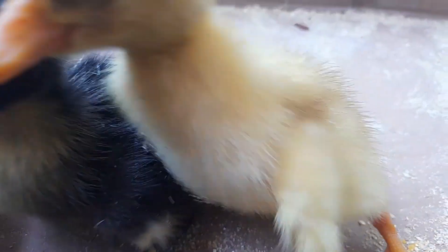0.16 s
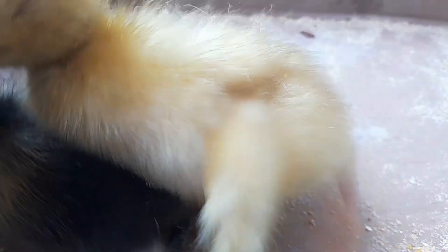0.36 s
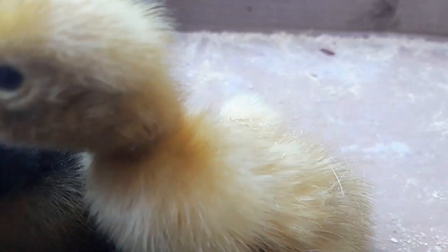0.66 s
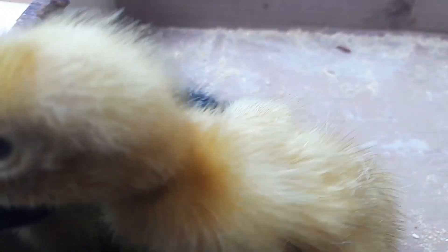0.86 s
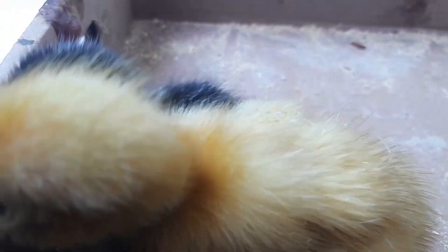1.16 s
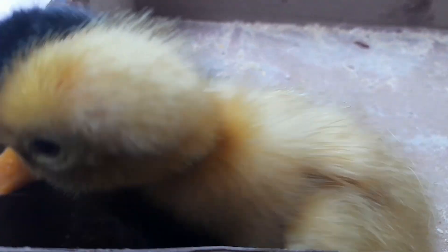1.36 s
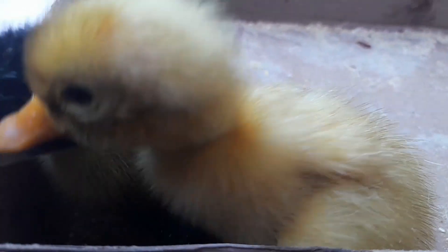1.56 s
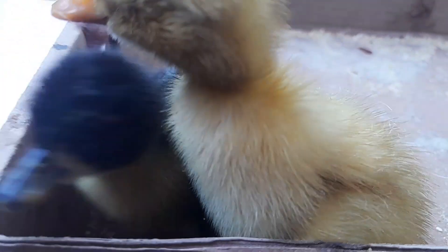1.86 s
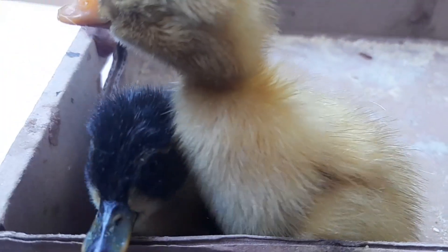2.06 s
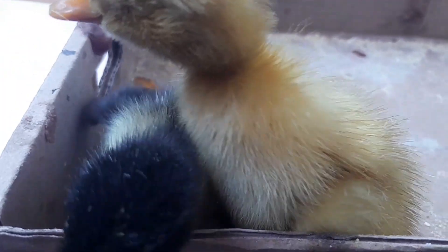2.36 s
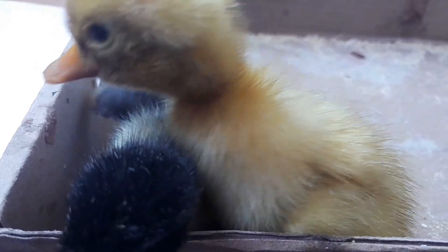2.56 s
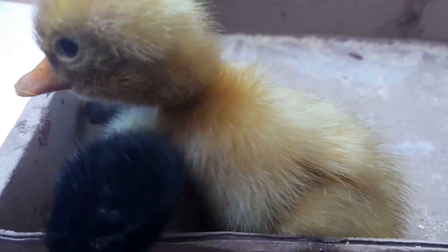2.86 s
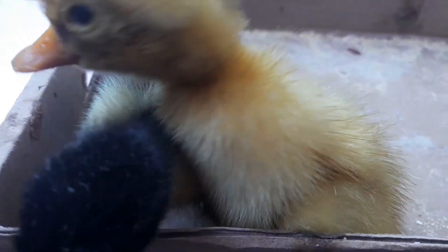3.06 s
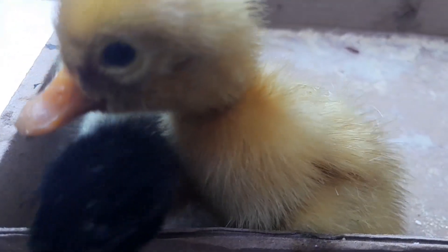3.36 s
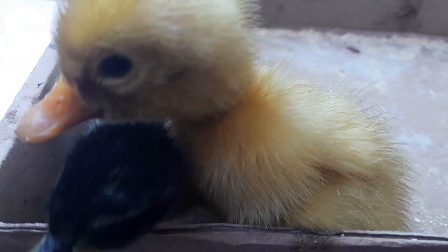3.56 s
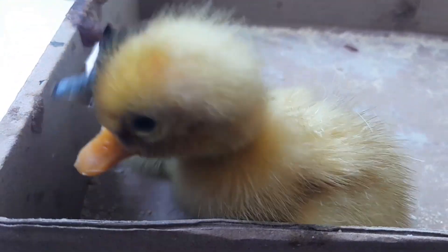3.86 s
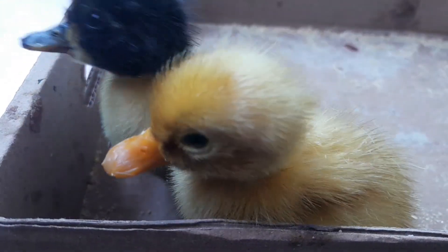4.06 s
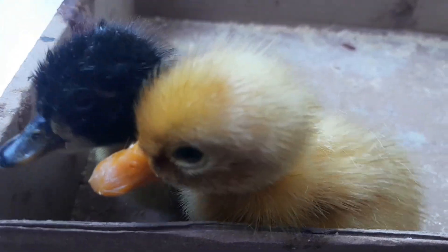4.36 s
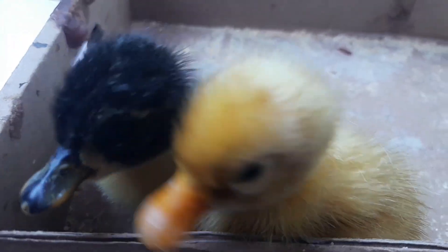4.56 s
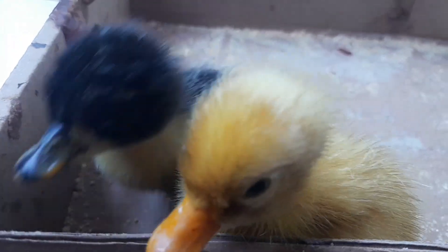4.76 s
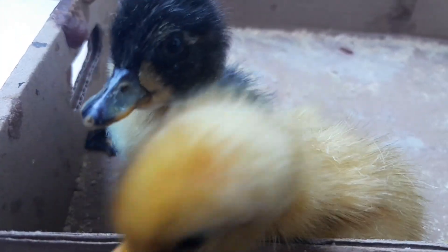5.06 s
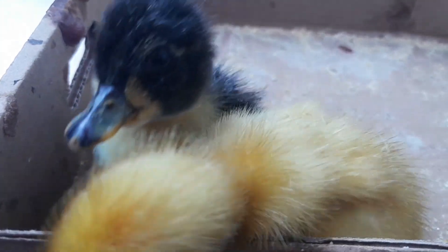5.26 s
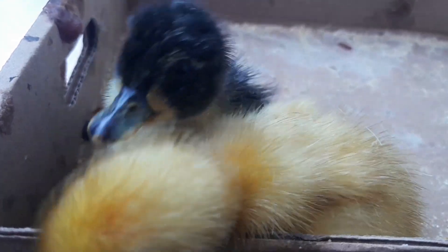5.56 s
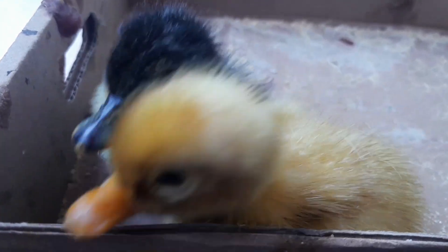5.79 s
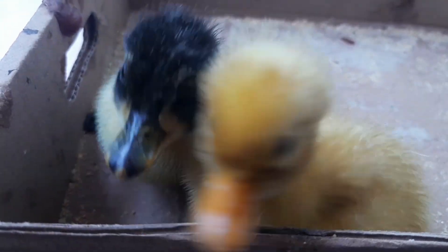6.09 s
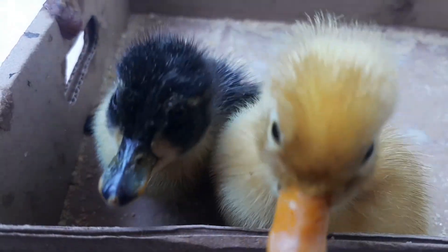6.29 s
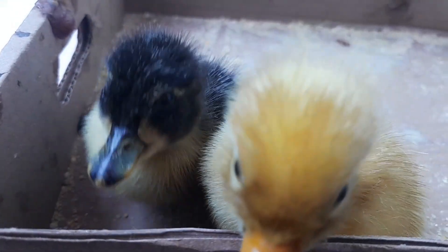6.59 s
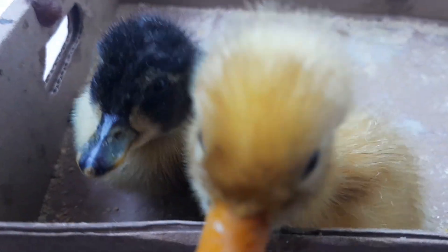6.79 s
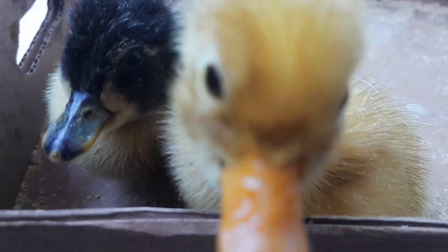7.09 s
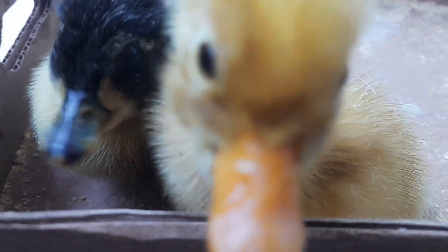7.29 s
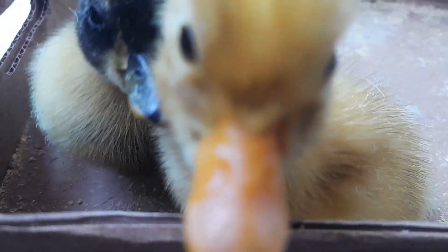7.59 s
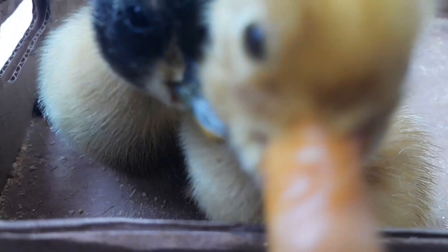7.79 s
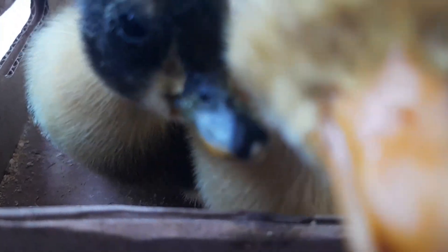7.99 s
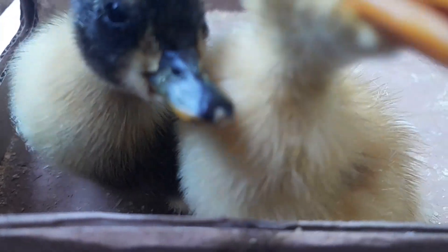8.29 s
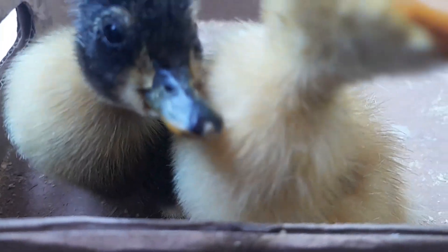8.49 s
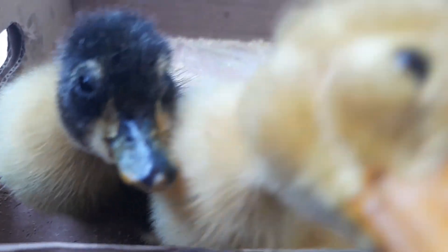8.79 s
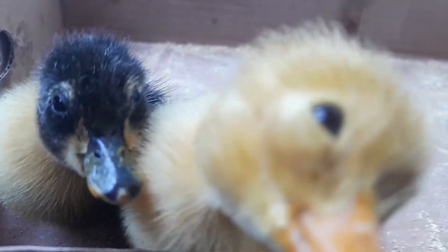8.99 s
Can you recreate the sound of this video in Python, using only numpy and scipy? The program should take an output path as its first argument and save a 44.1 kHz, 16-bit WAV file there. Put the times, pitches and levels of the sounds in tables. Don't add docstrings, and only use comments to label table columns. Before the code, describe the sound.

Intimate, dry close recording, leaning left. A high, slightly hoarse duckling whistle opens, followed by irregular scratchy steps, feathery rustles and dull cardboard knocks over a faint low drone. Weak, falling cheeps appear around the middle and again just before a strong run of six shrill peeps, each short and raspy at the end, rising and then staying high. Afterward only the fading background remains.

```python
import sys
import numpy as np
from scipy import signal
from scipy.fft import rfft, irfft, next_fast_len
from scipy.io import wavfile
from scipy.ndimage import uniform_filter1d, map_coordinates

SR = 44100
rng = np.random.default_rng(int(sys.argv[2]) if len(sys.argv) > 2 else 0)


def field_ratio(decibels):
    return 10 ** (np.asarray(decibels, dtype=float) / 20)


def unload_audio(sound):
    columns = np.transpose(np.atleast_2d(sound))
    steps = np.round(np.clip(columns, -1, 1) * 32767)
    wavfile.write(sys.argv[1], SR, steps.astype(np.int16))


N = 403074
TIME = np.arange(N) / SR

# time_s, machine_db, hiss_db
ROOM_LEVELS = [(0, -65, -64.5), (0.299, -68.5, -67.5), (1.1, -68, -71.5), (1.6, -68.5, -75),
               (1.95, -65.5, -79.5), (2.4, -67.5, -80.5), (3.3, -68.5, -82.5), (3.5, -65, -83),
               (3.9, -66.5, -82), (4.9, -67, -74), (5.6, -66, -82), (6.2, -67, -85), (6.9, -67, -73.5),
               (7.4, -67, -78), (7.75, -73, -80.5), (8.15, -72, -79.5), (8.5, -76, -87),
               (9.14, -74.5, -104)]
# centre_hz, width_hz, level_db
DRONE_LINES = [(158, 3, -2.5), (246.8, 12, 4), (280, 21, -9.5), (312, 20, -7.5), (426.6, 16, 2),
               (560.8, 18, -3.5), (728, 22, -8), (1022.6, 14, -11.5), (1520, 150, -20.5)]
# frequency_hz, level_db
AIR_SPECTRUM = [(80, -29), (170, -6.5), (300, -11.5), (650, -16.5), (1200, -28), (1600, -21.5), (2400, -40),
                (4000, -53)]
# frequency_hz, level_db
RUMBLE_SPECTRUM = [(20, -29.5), (45, -10.5), (75, 0.5), (105, 3.5), (170, -6.5), (260, -34)]
# frequency_hz, level_db
HISS_SPECTRUM = [(800, -6.5), (2000, 2.5), (3500, 0.5), (4700, -7.5), (9700, -1), (11500, -10), (16000, 2)]
# frequency_hz, t60_s
BOX_DECAY = [(1000, .06), (3500, .03), (4650, .035), (5000, .19), (5600, .18), (6600, .08), (12000, 0.07)]

# start_s, length_s, pitch_hz, level_db
BOOMS = [(.075, .06, 68, -62), (.445, .07, 172, -61), (.965, .06, 92, -59), (1.02, .05, 78, -63),
         (1.04, .06, 250, -65), (1.3, .05, 190, -56), (1.36, .06, 86, -58), (1.895, .07, 90, -59),
         (1.97, .07, 95, -62), (3.32, .12, 104, -63), (3.5, .17, 100, -63), (4.624, .03, 310, -49),
         (4.65, .03, 290, -55), (4.625, .05, 104, -54), (5.54, .14, 104, -65), (5.68, .14, 102, -63),
         (6.04, .23, 102, -63), (6.48, .08, 246, -65), (6.46, .2, 427, -68), (6.72, .1, 427, -65),
         (.56, .22, 172, -66)]
# peak_s, level_db, half_width_s
THUMPS = [(0.121, -62, 0.11), (.466, -57.5, 0.074), (.988, -63.5, 0.018), (1.305, -40.5, 0.0089),
          (1.34, -47, 0.02), (1.566, -57.5, 0.027), (1.898, -59, 0.023), (2.04, -56, 0.023),
          (2.137, -52, 0.022), (2.949, -46, 0.019), (4.044, -60, 0.011), (4.635, -45, 0.017),
          (5.72, -57.5, 0.043)]
# frequency_hz, level_db
WALL_SPECTRUM = [(40, -17), (100, 2), (170, 0.5), (330, -3.5), (600, -10), (1000, -12), (2000, -29.5)]

# peak_s, level_db, length_s, scrape_db (board relative to down)
STEPS = [(0.405, -48.5, 0.026, -19), (0.469, -55, 0.026, -14), (0.515, -47, 0.033, -8),
         (0.579, -54.5, 0.067, -7.5), (0.898, -54, 0.013, -7), (1.052, -51, 0.027, -10),
         (1.286, -51.5, 0.051, -13), (1.345, -47.5, 0.061, -5.5), (1.458, -55, 0.029, -8),
         (1.596, -53, 0.018, -14), (1.645, -56.5, 0.021, -8.5), (1.714, -58.5, 0.047, -7),
         (1.902, -43, 0.026, -10.5), (1.957, -58, 0.032, -2.5), (2.036, -46.5, 0.031, -8),
         (2.138, -42.5, 0.029, -9), (2.198, -49, 0.03, -11), (2.899, -46.5, 0.046, -8.5),
         (2.954, -54, 0.049, -1.5), (3.05, -58, 0.039, -8), (3.102, -49.5, 0.021, -4),
         (3.806, -58, 0.063, -7), (4.203, -57, 0.03, -5.5), (4.436, -52.5, 0.019, -9.5),
         (4.629, -47, 0.045, -6), (4.735, -59.5, 0.078, -7), (4.774, -52.5, 0.02, -28),
         (5.509, -59, 0.053, -8), (5.579, -57.5, 0.022, -10)]
# peak_s, level_db
BRUSHES = [(.253, -62), (.742, -62.5), (.988, -67.5), (1.501, -62), (2.365, -60), (2.707, -62),
           (2.835, -69), (3.159, -61.5), (3.376, -64.5), (3.658, -62), (3.721, -65.5), (3.915, -63),
           (4.126, -60), (4.311, -58), (4.393, -60.5), (4.472, -63), (4.565, -62), (4.863, -66.5),
           (4.999, -62), (5.093, -63.5), (5.165, -62.5), (5.271, -67.5), (5.353, -66.5), (5.634, -60.5),
           (5.708, -61.5), (5.787, -62.5), (5.953, -65.5), (6.058, -68.5), (6.572, -66), (6.837, -65),
           (.05, -60), (.19, -51), (3.555, -66), (3.27, -66), (3.41, -66), (3.605, -59.5), (5.42, -66),
          (2.649, -69.5), (2.745, -65.5), (4.272, -62), (4.665, -49), (8.289, -89), (8.418, -79),
          (8.918, -90)]
# frequency_hz, level_db
DOWN_SPECTRUM = [(1500, -31.5), (3500, -7), (7900, -7.5), (9700, -3), (11200, -11.5), (14000, -3),
                 (16000, -6.5)]
# frequency_hz, level_db
BOARD_SPECTRUM = [(300, -38.5), (720, 2.5), (1000, -3), (2800, -1.5), (4000, -14.5), (7000, -15)]

# start_s, length_s, start_hz, end_hz,
# level_db
MURMURS = [(0.692, 0.053, 3550, 3530, -73.5), (1.592, 0.074, 3530, 3600, -72),
           (1.932, 0.086, 3650, 3550, -71), (3.227, 0.035, 3620, 3530, -81), (3.25, .03, 3960, 5400, -71),
           (3.264, 0.06, 5450, 6260, -61), (3, .03, 4770, 5130, -65), (4.82, 0.054, 4330, 4080, -77.5),
           (5.399, 0.11, 3610, 3260, -69), (5.928, 0.0785, 3464, 3444, -75.5),
           (6.436, 0.027, 6130, 5600, -67), (6.439, 0.054, 5400, 4580, -44),
           (6.479, 0.038, 4600, 4450, -47.5), (6.222, 0.045, 3870, 3580, -83),
           (6.684, 0.11, 2344, 1740, -50), (.11, .018, 7500, 7450, -62), (.104, .03, 2100, 2500, -66)]

# time_s, pitch_hz, effort_db
SINGLE_PEEPS = [
    [(.067, 5380, -44), (.077, 5240, -27), (.084, 5130, -15), (.104, 5085, -18), (.119, 5055, -11.5),
     (.13, 4975, -8.5), (.142, 4940, -16), (.16, 4960, -19.5), (.169, 4900, -42)],
    [(2.99, 4380, -60), (3.007, 4580, -61), (3.022, 4280, -44.5), (3.041, 3600, -53), (3.064, 3645, -43.5),
     (3.078, 3360, -81)],
    [(3.293, 4850, -74), (3.301, 4830, -45.5), (3.325, 4180, -34.5), (3.348, 4020, -37), (3.355, 4180, -52),
     (3.372, 4150, -60)],
    [(6.42, 4830, -71), (6.434, 4900, -40.5), (6.446, 4730, -42), (6.472, 4360, -34.5), (6.488, 4000, -40),
     (6.507, 4107, -39), (6.53, 4030, -69)],
]
# time_s, pitch_hz, effort_db
CLIMBING_PEEPS = [
    [(6.675, 5285, -48.5), (6.695, 5200, -40), (6.709, 5038, -16.5), (6.717, 4979, -29.5),
     (6.732, 5020, -13), (6.766, 4980, -16), (6.782, 5000, -23.5), (6.796, 5000, -40), (6.822, 5000, -59)],
    [(6.922, 4980, -42), (6.934, 5100, -24), (6.946, 5160, -25.5), (6.952, 5180, -13.5), (6.976, 5162, -6),
     (6.986, 5165, -14.5), (6.998, 5030, -11.5), (7.02, 5090, -12.5), (7.052, 4930, -35)],
    [(7.203, 5380, -60.5), (7.216, 5410, -32), (7.224, 5470, -25), (7.233, 5234, -17.5),
     (7.256, 5273, -11.5), (7.288, 5197, -22), (7.324, 5240, -19.5), (7.33, 5240, -43), (7.342, 5245, -47)],
]
# time_s, pitch_hz, effort_db
TOP_PEEPS = [
    [(7.472, 5320, -44.5), (7.494, 5380, -28), (7.503, 5375, -12.5), (7.53, 5402, -10), (7.555, 5388, -7.5),
     (7.574, 5455, -10), (7.598, 5390, -22), (7.617, 5300, -43)],
    [(7.752, 5400, -51.5), (7.764, 5340, -25.5), (7.78, 5380, -22.5), (7.784, 5420, -8.5),
     (7.819, 5440, -7), (7.826, 5480, -12.5), (7.853, 5544, -16), (7.884, 5500, -31), (7.898, 5450, -48.5)],
    [(8.035, 5350, -61), (8.052, 5278, -25.5), (8.06, 5276, -12.5), (8.066, 5300, -15),
     (8.089, 5375, -15.5), (8.139, 5430, -14), (8.149, 5590, -22), (8.168, 5370, -41)],
]
# time_s, leak_db
LEAKS = [
    [(0.056, -65.5), (0.094, -64), (0.102, -51), (0.122, -51), (0.128, -61.5), (0.14, -54), (0.158, -52),
     (0.174, -65), (0.185, -63.5)],
    [(6.672, -75), (6.69, -77.5), (6.7, -58), (6.718, -39.5), (6.752, -41.5), (6.776, -45), (6.814, -78.5),
     (6.825, -79.5)],
    [(6.915, -73), (6.937, -47.5), (6.949, -41), (6.989, -36), (7.031, -42), (7.06, -65)],
    [(7.2, -77), (7.212, -60.5), (7.23, -61), (7.24, -41.5), (7.25, -40), (7.29, -36), (7.332, -46),
     (7.345, -77.5)],
    [(7.465, -72), (7.499, -38.5), (7.515, -39.5), (7.523, -41.5), (7.551, -38), (7.575, -35.5),
     (7.597, -39), (7.62, -60.5)],
    [(7.745, -78), (7.777, -44), (7.785, -42.5), (7.807, -48.5), (7.829, -38.5), (7.851, -38.5),
     (7.883, -48.5), (7.9, -64.5)],
    [(8.03, -83), (8.04, -63), (8.066, -43.5), (8.132, -40.5), (8.168, -52.5), (8.175, -68)],
]
# time_s, leak_db
FAR_LEAK = [(0, -90), (9, -98)]
# overtone_db, tremble_db (over the leak), right_port_db, hoarse_db, hoarse_s (start time)
VOICES = [(-28, 4, -25, -26, .159), (-32, 4, -32, -18, 3.054), (-28, 6, -30, -14, 3.353),
          (-16, 6, -34, -17.5, 6.506), (-15, 7.5, -21, -16.5, 6.774), (-22, 3.5, -36, -21, 7.03),
          (-29, 3, -34, -11, 7.316), (-33, 4.5, -25.5, -14.5, 7.59), (-42.5, 10, -38, -18, 7.872),
          (-51, 12, -28, -12.5, 8.146)]
# growth (dB per dB of effort), tilt_db (per 100 Hz of pitch rise), lead_s
OVERTONES = [(.93, 0, .024), (.93, 0, .017), (.7, 0, .017), (.93, 0, .017), (.93, 0, .023), (.8, -5, .016),
             (.6, -6, .014), (.9, 0, .013), (.9, 0, .012), (.9, 0, .014)]
# upper_hz, upper_db, lower_hz, lower_db, third_partial_db
THROATS = [(6100, 0, 2300, -12, 0), (6000, -10, 2500, -20, 0), (6000, -10, 2500, -20, 0),
           (6000, -10, 2500, -20, 8), (6300, -3, 2100, -9, -2), (6800, -3, 2300, -18, -2),
           (6600, -3, 2300, -16, 6), (6300, -3, 2500, -14, 0), (6500, -3, 2600, -14, 0),
           (6400, -3, 2300, -16, 0)]
# frequency_hz, level_db
THIRD_PARTIAL = [(12000, -36), (14300, -28), (15100, -1), (16000, 2.5)]
# time_s, width_s
CRACKS = [(.078, .0007), (0.082, 0.0009), (6.769, .0012), (0.105, 0.0011), (0.0912, 0.0016),
          (0.162, 0.0012), (3.319, 0.0013), (3.33, 0.0016), (3.028, .002), (3.041, .002), (3.361, .001),
          (3.366, .001), (6.44, .002), (6.467, 0.0012), (6.489, 0.0011), (6.987, 0.0019), (7.224, 0.00074),
          (7.491, 0.01), (7.593, 0.0021), (7.827, 0.0019), (7.867, 0.004), (7.883, 0.0015), (8.067, 0.0011),
          (8.084, 0.0014), (8.088, 0.0011), (8.107, 0.0032), (8.124, 0.00063)]
# time_s, half_length_s, beat_hz, depth (0-1)
FLUTTERS = [
    (7.544, .018, 253, .55),
    (5.4, 0.021, 300, 0.37),
    (3.314, 0.015, 230, 0.46),
    (7.315, .014, 130, 0.3),
    (8.075, 0.029, 112, 0.25),
    (6.782, .01, 200, .4),
]
# share (of lead_s), first_ratio, last_ratio (of pitch), level_db, blur_hz
LEAD_INS = [(1.05, .57, .86, -39, 2200), (.55, .86, 1.14, -35, 3000)]
# delay_s, level_db
WALL_ECHOES = [(.005, -10.5), (0.01, -14)]
# frequency_hz, level_db
BREATH_SPECTRUM = [(900, -42), (1300, -29), (2000, -16), (3200, -18.5), (4300, -6.5), (5300, 3), (6300, 0),
                   (7700, -8), (8600, -12.5), (10400, -12), (11700, -26.5), (14900, -11), (16000, -22.5)]
# frequency_hz, level_db
RIGHT_BREATH_COLOUR = [(2000, 4.5), (2800, 4.5), (4000, -8.5), (5600, 2.5), (6500, 2), (9000, -7.5), (11500, -17.5),
                       (15000, -3)]


def ports(left_db, right_db):
    return field_ratio(np.array([[left_db], [right_db]]))


def unit(x):
    return x / np.sqrt(np.mean(np.abs(x) ** 2, -1, keepdims=True) + 1e-20)


def along(points, hz):
    f, v = np.transpose(points)
    return np.interp(np.log(hz + 1), np.log(f + 1), v)


def wobble(rate, count=N):
    knots = rng.standard_normal((2, int(count * rate / SR) + 4))
    return np.array([map_coordinates(k, [np.arange(count) * rate / SR]) for k in knots])


def tremble(rate, count):
    return (wobble(rate, count=count) + 1j * wobble(rate, count=count)) / np.sqrt(2)


def field(bins, frames):
    raw = rng.standard_normal((1025, N // 1024 + 3), dtype=np.float32)
    smooth = uniform_filter1d(uniform_filter1d(raw, bins, axis=0), frames, axis=1)
    return smooth / smooth.std()


def trail(x, lag_s):
    k = 1 / (max(lag_s, 1e-4) * SR)
    return signal.lfilter([k], [1, k - 1], x)


def noise(gain, lo_hz, hi_hz, patchy_db, alike):
    a, b = rng.standard_normal((2, 2, 1025, N // 1024 + 3), dtype=np.float32)
    z = (a + 1j * b) * field_ratio(patchy_db * field(bins=9, frames=2))
    alike = np.clip(alike, 0, 1)
    shared = alike * z[0] * np.exp(2j * field(bins=6, frames=24))
    z[1] = shared + np.sqrt(1 - alike ** 2) * z[1]
    white = signal.istft(z, window="cosine", nperseg=2048)[1]
    m = next_fast_len(N)
    hz = np.fft.rfftfreq(m, 1 / SR)
    g = np.atleast_2d(gain(hz))
    share = np.sum(g[0, (hz > lo_hz) & (hz < hi_hz)] ** 2) / np.sum(g[0] ** 2)
    return unit(irfft(rfft(white, m) * g, m)[:, :N]) / np.sqrt(share)


def swell(s, db, rise, fall):
    d = np.arange(-SR // 10, SR // 10) / SR
    scale = np.where(d < 0, rise[:, None], fall[:, None])
    shape = field_ratio(db[:, None] - 1.2 - 6 * np.abs(d / scale) ** 1.6)
    at = np.clip(np.round((s[:, None] + d) * SR).astype(int), 0, N - 1)
    return np.sqrt(np.bincount(at.ravel(), shape.ravel() ** 2, N))


def glide(s, length, start_hz, end_hz, db, blur_hz, steady=0, edge=.64):
    count = int(length * SR)
    u = np.arange(count) / count
    turn = np.exp(2j * np.pi * np.cumsum(start_hz + (end_hz - start_hz) * u) / SR)
    size = field_ratio(db) * np.sin(np.pi * u) ** edge * (steady + tremble(blur_hz, count=count))
    return round(s * SR), np.real(size * (turn + field_ratio(-20.5) * turn ** 2))


def place(out, start, x):
    out[:, start:start + x.shape[1]] += x


def background():
    s, drone_db, hiss_db = np.transpose(ROOM_LEVELS)
    rumble_db = -69.5 + 1.4 * (drone_db + 68.0)

    def low_gain(f):
        lines = sum(field_ratio(db) ** 2 / (1 + (2 * (f - c) / w) ** 2) ** 2.5 for c, w, db in DRONE_LINES)
        return np.sqrt(lines + field_ratio(along(AIR_SPECTRUM, f)) ** 2)

    low = noise(low_gain, 180, 900, patchy_db=2.0, alike=.75)
    low *= field_ratio(np.interp(TIME, s, drone_db) + 1.2 * wobble(6)[0]) * ports(5.1, 2.2)
    rumble = noise(lambda f: field_ratio(along(RUMBLE_SPECTRUM, f)), 50, 200, patchy_db=3.5, alike=0.3)
    rumble *= field_ratio(np.interp(TIME, s, rumble_db) + 1.5 * wobble(3.9)[0]) * ports(1.1, 0.45)
    hiss = noise(lambda f: field_ratio(along(HISS_SPECTRUM, f)), 6500, 19000, patchy_db=4.2, alike=1.0)
    hiss *= field_ratio(np.interp(TIME, s, hiss_db) + 1.4 * wobble(9.5)[0]) * ports(1.5, 2.2)
    return low + rumble + hiss


def box(x):
    hz, t, z = signal.stft(rng.standard_normal((2, SR // 3)), SR, nperseg=256)
    decay = field_ratio(-60 * t / along(BOX_DECAY, hz)[:, None])
    tail = signal.istft(z * decay, SR, nperseg=256)[1]
    return signal.fftconvolve(x[None], tail / np.linalg.norm(tail[0]), axes=1)[:, :N]


def booms():
    out = np.zeros((2, N))
    for s, length, hz, db in BOOMS:
        place(out, *glide(s, length, hz, hz, db, 35, steady=1.8))
    lag_s = .0025
    return np.array([out[0], np.roll(out[1], round(lag_s * SR))]) * ports(0, -4)


def thumps():
    s, db, width = np.transpose(THUMPS)
    wall = noise(lambda f: field_ratio(along(WALL_SPECTRUM, f)), 94, 590, patchy_db=3.5, alike=1.0)
    return swell(s, db, 0.52 * width, 2.0 * width) * wall * ports(0, -7.5)


def scuffs():
    brush_s, scrape_db, rise_share = .036, -6.5, 0.51
    brushes = [(*row, brush_s, scrape_db) for row in BRUSHES]
    s, db, length, board_db = np.transpose(STEPS + brushes)
    rise, fall = rise_share * length, (1 - rise_share) * length
    grains = unit(field_ratio(1.9 * wobble(260)[0]))
    down = noise(lambda f: field_ratio(along(DOWN_SPECTRUM, f)), 5900, 14800, patchy_db=2.6, alike=0.78)
    down *= swell(s, db, rise, fall) * ports(0, -8.5)
    board = noise(lambda f: field_ratio(along(BOARD_SPECTRUM, f)), 835, 3036, patchy_db=2.8, alike=0.84)
    board *= swell(s, db + board_db, 0.97 * rise, 1.84 * fall) * ports(-0.0023, -0.95)
    return grains * (down + board)


def murmurs():
    out = np.zeros((2, N))
    for row in MURMURS:
        slide_hz = abs(row[3] - row[2])
        start, x = glide(*row, 150 + 0.9 * slide_hz, steady=2.6 * np.exp(-slide_hz / 700))
        place(out, start, x * ports(-0.87, -10.0))
    return out


def flutter(t):
    s, half, beat_hz, depth = np.transpose(FLUTTERS)[:, :, None]
    beat = np.cos(2 * np.pi * beat_hz * (t - s)) - .4
    return 1 + np.sum(depth * np.exp(-((t - s) / half) ** 4) * beat, 0)


def cracks(t):
    s, width = np.transpose(CRACKS)[:, :, None]
    return np.prod(1 - 1.08 * np.exp(-((t - s) / (1.1 * width)) ** 2), 0)


def hoarse_edges(at, hz, top_db, lead_s, closing_s, closing_db):
    lead_ins = [glide(at[0] - share * lead_s, .028, a * hz[1], b * hz[1], top_db + db, blur, edge=.9)
                for share, a, b, db, blur in LEAD_INS]
    end_db = top_db + closing_db
    drop = glide(closing_s, 0.024, .96 * hz[-3], .89 * hz[-3], end_db + 4.5, 1000, edge=1.3)
    rasp = glide(closing_s, 0.024, .9 * hz[-3], .66 * hz[-3], end_db - 8, 1700, edge=1.3)
    return [*lead_ins, drop, rasp]


def peeps():
    out, air = np.zeros((2, N)), np.zeros((2, N))
    leaks = LEAKS[:1] + [FAR_LEAK] * len(SINGLE_PEEPS[1:]) + LEAKS[1:]
    calls = SINGLE_PEEPS + CLIMBING_PEEPS + TOP_PEEPS
    for rows, leak, overtone, throat, character in zip(calls, leaks, OVERTONES, THROATS, VOICES):
        grows, tilt_db, lead_s = overtone
        upper_hz, upper_db, lower_hz, lower_db, third_db = throat
        second_db, rough_db, far_db, closing_db, closing_s = character
        at, hz, effort_db = np.transpose(rows)
        top_db = effort_db.max()
        part = slice(round((at[0] - .008) * SR), round((at[-1] + 0.0021) * SR))
        t = TIME[part]
        count = len(t)

        knots = np.r_[t[0], at, t[-1]]
        whistle = np.interp(t, knots, np.pad(field_ratio(effort_db) ** 0.59, 1)) ** (1 / 0.6)
        effort = whistle / field_ratio(top_db)
        ends = np.interp(t, knots, np.pad(np.ones(len(at)), 1))
        breath = field_ratio(6.5 + np.interp(t, *np.transpose(leak))) * ends
        pitch = np.interp(t, at, hz)
        phase = 2 * np.pi * np.cumsum(pitch) / SR

        second = field_ratio(top_db + second_db) * trail(effort ** grows, .003) * ends
        second *= field_ratio(-900 * np.maximum(t - closing_s, 0))
        second *= field_ratio(np.clip(tilt_db * (pitch - np.median(pitch)) / 100, -8, 6))
        third = second * field_ratio(third_db + along(THIRD_PARTIAL, 3 * pitch)) * effort ** 0.4

        rough = field_ratio(rough_db + np.array([[0], [5]])) * breath / (whistle + 1e-6)
        rough = np.clip(rough, .1, [[.9], [.6]])
        size = np.sqrt(1 - rough ** 2) + rough * tremble(520, count=count)
        size *= flutter(t)
        size[0] *= cracks(t)
        path = [[0], [1]] * (rng.uniform(0, 2 * np.pi) + 1.5 * wobble(40, count=count))
        tone = whistle * size * np.exp(1j * (phase + path))
        tone += ports(0, -9) * second * (1 + 0.46 * tremble(500, count=count)) * np.exp(2j * phase)
        tone += ports(0, 7) * third * (1 + .6 * tremble(700, count=count)) * np.exp(3j * phase)
        voice = np.sqrt(2) * tone.real * ports(0, far_db)

        bands = sum(field_ratio(db) * tremble(1100, count=count) * np.exp(2j * np.pi * f * t)
                    for f, db in ((upper_hz, upper_db), (lower_hz, lower_db)))
        out[:, part] += voice + breath * bands.real * ports(0, -9)
        air[:, part] = breath * ports(0, -12.5)

        extras = hoarse_edges(at, hz, top_db, lead_s, closing_s, closing_db)
        if top_db < -25:
            extras += [(part.start + round(lag * SR), field_ratio(db) * voice * ports(0, 9.1))
                       for lag, db in WALL_ECHOES]
        for start, x in extras:
            place(out, start, x * ports(0, -21.5))

    bursts = unit(field_ratio(2.4 * wobble(300)))

    def breath_gain(f):
        return field_ratio(along(BREATH_SPECTRUM, f) + [[0], [1]] * along(RIGHT_BREATH_COLOUR, f))

    return out + air * bursts * noise(breath_gain, 6614, 8200, patchy_db=3.0, alike=0.4)


def scene():
    voices = peeps() + murmurs()
    echo = ports(-30.5, -35.5) * box(voices[0])
    return voices + echo + scuffs() + thumps() + booms() + background()


def band_limit(x):
    return signal.sosfilt(signal.butter(12, 16520, fs=SR, output="sos"), x)


def record(dry):
    clip, hardness, top_hz, slope_hz = .92, 6, 15890, 250
    dry = dry / (1 + np.abs(dry / clip) ** hardness) ** (1 / hardness)
    m = next_fast_len(N)
    slope = np.clip((top_hz - np.fft.rfftfreq(m, 1 / SR)) / slope_hz, 0, 1)
    return band_limit(irfft(rfft(dry, m) * slope, m)[:, :N])


dry = scene()
out = record(dry)
unload_audio(out)
```